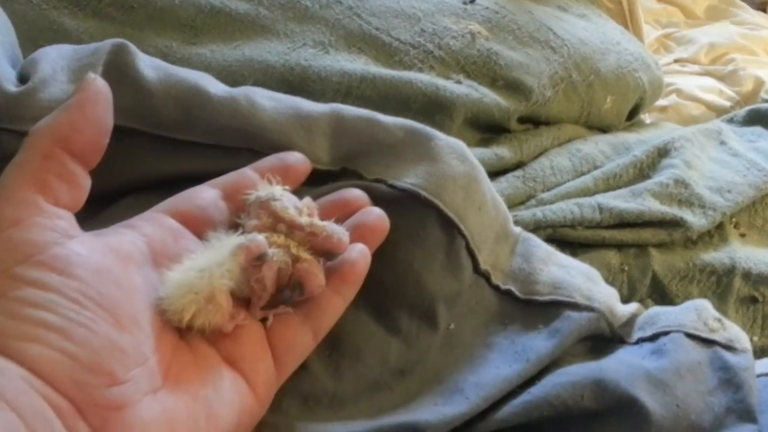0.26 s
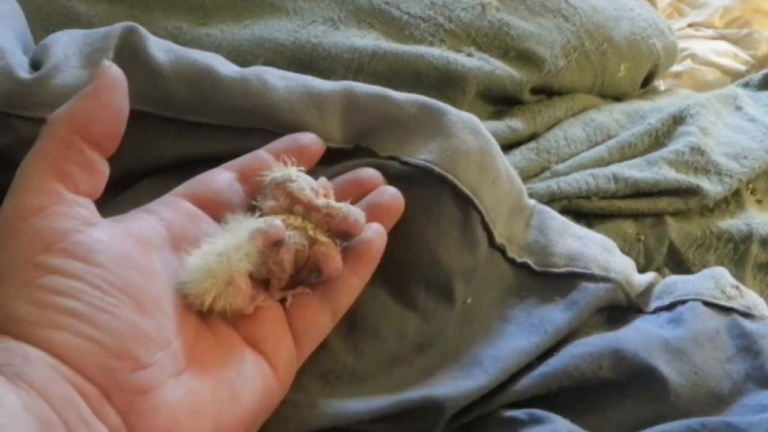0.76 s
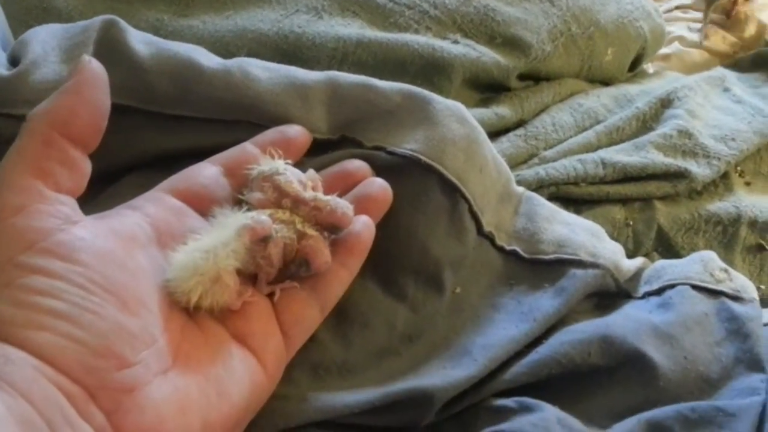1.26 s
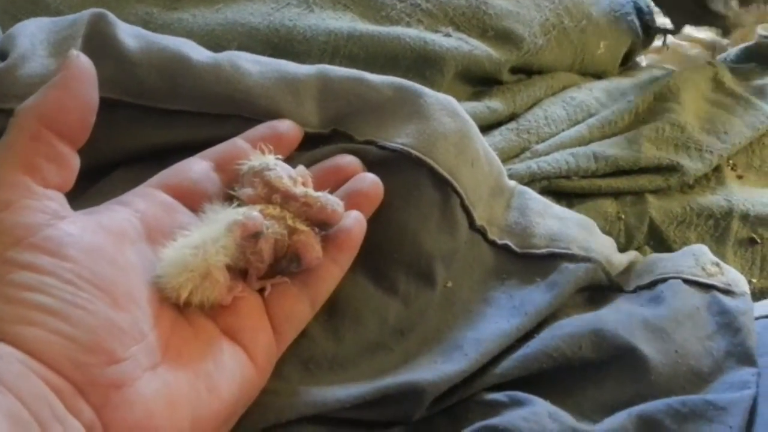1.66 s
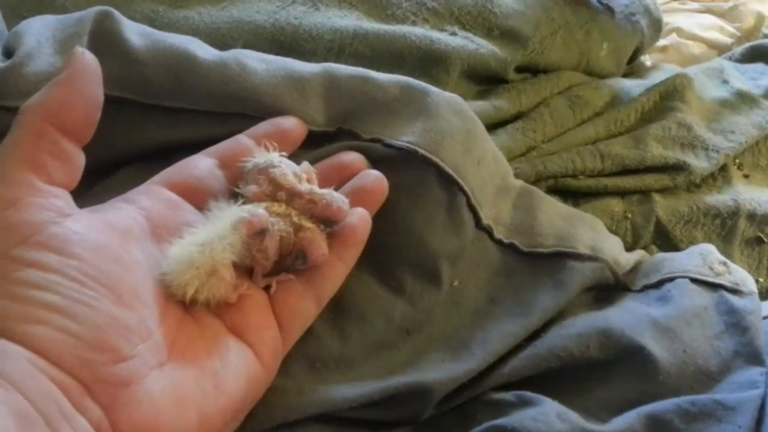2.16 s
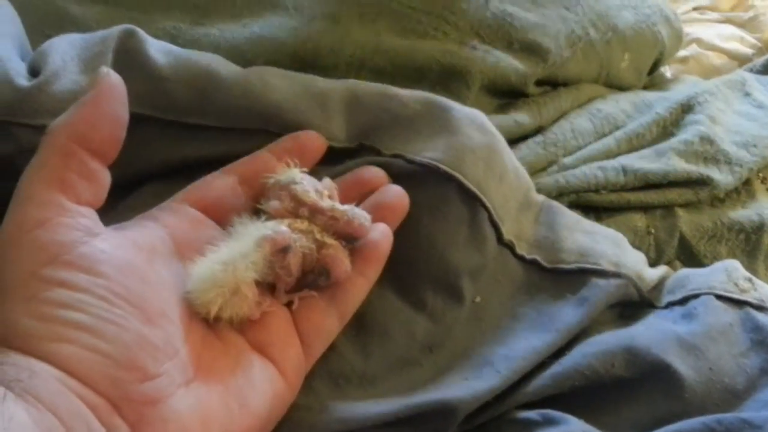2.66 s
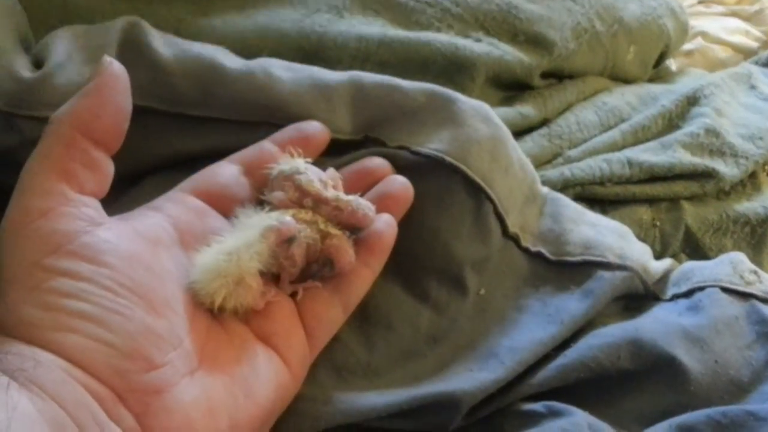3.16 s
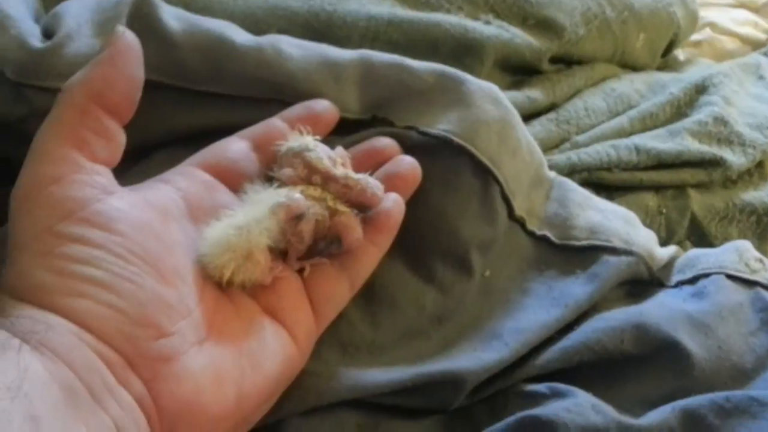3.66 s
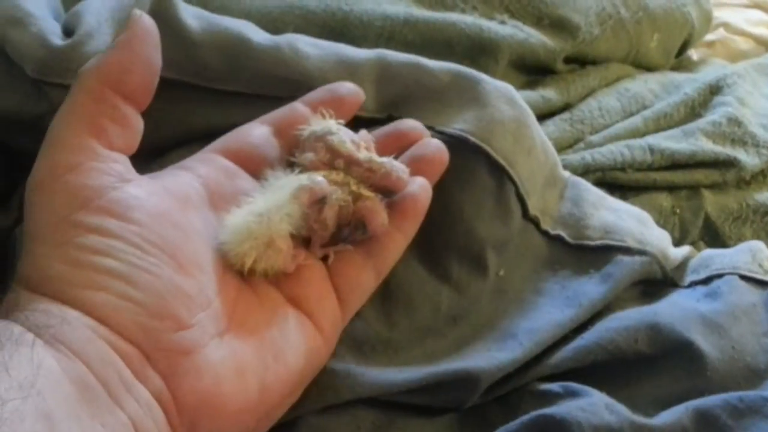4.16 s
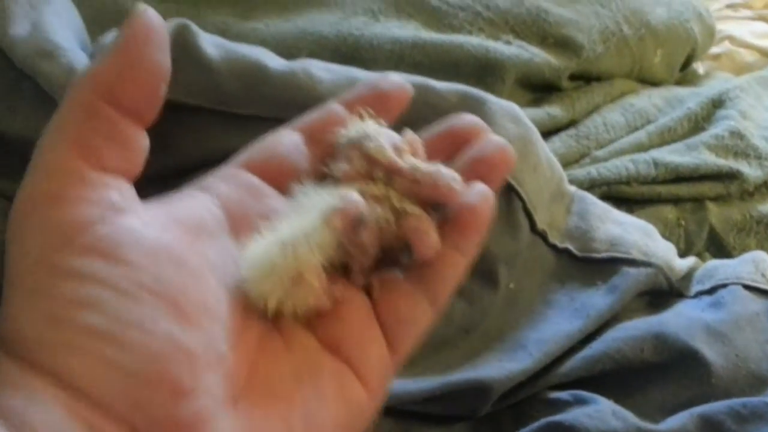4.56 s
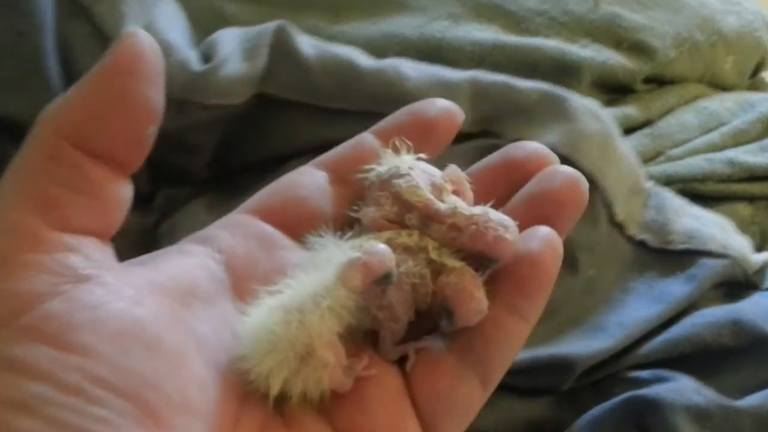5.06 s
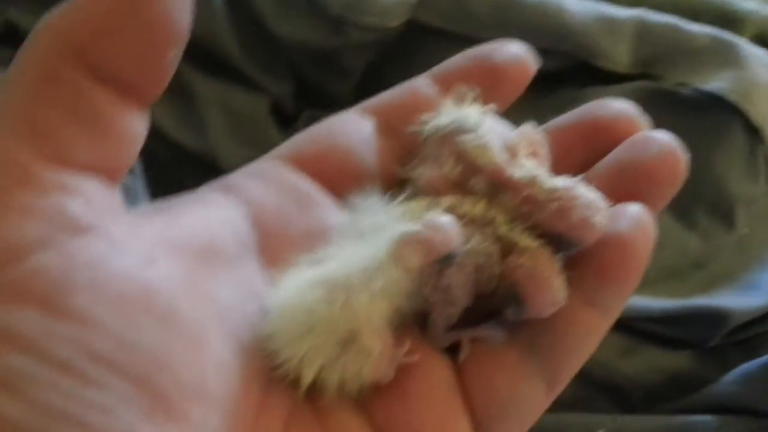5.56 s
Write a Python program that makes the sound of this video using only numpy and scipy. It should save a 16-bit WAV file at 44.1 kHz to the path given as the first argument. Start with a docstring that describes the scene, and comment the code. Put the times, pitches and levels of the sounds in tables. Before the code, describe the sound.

Two newly hatched chicks beg close to the microphone in a small, softly reverberant room. The fading tail of an earlier chirp opens the sound, with tiny ticks in the first half second, the clearest at 0.5. Raspy chirps, each about a fifth of a second, glide from roughly 1.7 kHz up to a whistle near 3 kHz and fall. Two overlap at 0.65 to 0.9, one follows at 1.0, then a pause until a weaker one at 2.15. Another overlapping pair comes at 2.65 to 2.95, then single chirps at 3.2 and 3.55. A barely audible peep at 4.05 precedes the loudest, clearest chirp at 4.5. Faint low room noise swells and sinks over a slight steady hum. Sparse little ticks recur near 1.8, 2.5, 4.1 and 5.6. Soft bright cloth brushing grows from 4.4, peaks around 5.2 and continues, with duller rustle, to the end near 5.8.

```python
"""Two begging cockatiel chicks

Two newly hatched cockatiels beg from an open hand, close to the microphone in a small room.
Each chirp is a gliding tone with overtones: it starts low, climbs through a rasp to a clear whistle
near 3 kHz and drops away; some overlap. Around them lie a faint peep, small ticks of filtered noise,
a soft brush of cloth and a low room noise that swells and sinks, with a hum."""
import sys
import numpy as np
from scipy import signal
from scipy.fft import rfft, irfft, next_fast_len
from scipy.io import wavfile
from scipy.ndimage import uniform_filter1d, minimum_filter1d, map_coordinates

SR = 44100
rng = np.random.default_rng(int(sys.argv[2]) if len(sys.argv) > 2 else 0)


def int16_out(signal):
    """Quantize to a 16-bit WAV file."""
    q = np.round(np.clip(np.atleast_2d(signal).T, -1, 1) * 32767)
    wavfile.write(sys.argv[1], SR, q.astype(np.int16))


N = 256614  # length [samples]
TOP_HZ = 15150  # band limit

# Low room noise, level over time: (time [s], level [dB])
LOW_NOISE_LEVEL = [(0, -67.5), (.55, -66), (.7, -60), (1.0, -52.5), (1.25, -52.5), (1.35, -62),
                   (1.52, -56.5), (1.7, -69), (2.0, -78.5), (2.17, -54), (2.32, -53.5), (2.5, -62.5),
                   (2.7, -74), (3.0, -60.5), (3.15, -64), (3.42, -57.5), (3.7, -49.5), (3.85, -59.5),
                   (3.97, -71.5), (4.3, -67), (4.72, -58.5), (4.95, -68), (5.4, -70), (5.6, -59.5),
                   (5.82, -62)]
# Spectrum of the low room noise: (frequency [Hz], gain [dB])
LOW_NOISE_COLOUR = [(15, -54), (25, -29.5), (64, -2), (91, -8.5), (114, 4.5), (147, -5.5), (313, -3),
                    (376, -2.5), (554, -10), (888, -11.5), (1400, -16.5), (1820, -46), (3080, -120)]
# Bright brush of cloth, level over time: (time [s], level [dB])
CLOTH_LEVEL = [(0, -66), (.6, -71), (1.3, -62), (1.55, -69.5), (1.75, -74), (2.05, -69), (2.45, -55.5),
               (2.6, -65.5), (3.95, -68.5), (4.15, -72), (4.25, -63), (4.45, -53.5), (4.9, -51.5),
               (5.2, -50.5), (5.5, -56.5), (5.65, -60.5), (5.82, -56.5)]
# Spectrum of the brush: (frequency [Hz], gain [dB])
CLOTH_COLOUR = [(1760, -38.5), (3000, -13), (3550, -13.5), (4490, -9), (6510, -3), (7350, 2.5), (8750, -8),
                (13900, -12.5), (14700, -17), (15000, -25.5)]
# Duller rustle of cloth, level over time: (time [s], level [dB])
RUSTLE_LEVEL = [(0, -54), (.2, -68), (.6, -65), (1.3, -70), (1.5, -57), (1.7, -71.5), (4.1, -73),
                (4.4, -68), (5.0, -64.5), (5.2, -59), (5.45, -64.5), (5.82, -57.5)]
# Spectrum of the rustle, also of the dull part of a tick: (frequency [Hz], gain [dB])
RUSTLE_COLOUR = [(400, -4.5), (1100, -6.5), (2200, 0), (3000, -4.5), (4500, -4), (7000, -17.5)]
# Small ticks, before the common trims: (time [s], level [dB], dull part re snap [dB], decay t60 [s])
TICKS = [(0.1289, -54.5, -2.5, 0.06), (0.2074, -41.5, -21, 0.06), (0.2886, -48, -3.5, 0.06),
         (0.3795, -50.5, -10, 0.06), (0.5078, -27, -25, 0.06), (1.8223, -49.5, -24, 0.06),
         (1.8731, -54.5, -1, 0.06), (2.5155, -51, -17.5, 0.06), (4.0502, -46.5, -29.5, 0.06),
         (4.1791, -49.5, -25.5, 0.06), (5.579, -46, -1, 0.06)]
# Spectrum of the bright snap of a tick: (frequency [Hz], gain [dB])
TICK_COLOUR = [(1180, -29.5), (2000, -9), (2760, -17), (3760, -12), (4200, -22.5), (4930, -6.5),
               (7390, -4.5), (10300, -17.5), (11500, -16), (13900, -23.5), (15000, -37.5)]
# Decay of the room tail: (frequency [Hz], t60 [s])
ROOM_DECAY = [(300, 0.22), (1600, 0.23), (2200, 0.25), (3100, 0.29), (4400, 0.3), (7000, 0.25),
              (12000, .26)]
# Chirps of each chick, one list per chirp, levels before throat and room:
# (time [s], pitch [Hz], level [dB], overtone lift [dB], roughness [0-1])
FIRST_CHICK = [
    [(.650, 1818, -20.5, 0, .15), (.672, 1942, -13.5, 3.5, .25), (.692, 2002, -16, 0, 0.4),
     (.715, 2292, -18.5, -7, 0.8), (.738, 2558, -15, 3.5, .7), (.757, 2843, -18, 10, .6),
     (.780, 3130, -26.5, 10, 0.4), (.810, 2906, -26.5, 9.5, 0.02), (.835, 2400, -28, -7.5, 0.6),
     (.855, 1998, -34, 7.5, 0.9)],
    [(1.008, 1571, -36.5, 8, 0.3), (1.037, 1740, -25.5, 1.5, 0.2), (1.045, 2034, -28, 4, .7),
     (1.075, 2146, -20, -7.5, 0.4), (1.110, 2358, -26, 3.5, .6), (1.125, 2888, -17, -5, .6),
     (1.155, 3103, -16, -11, .2), (1.168, 2950, -24, -4.5, .6), (1.177, 2192, -22, -0.5, 0.5),
     (1.197, 1530, -36, -3, 0.8)],
    [(2.123, 1615, -71, 5, 1), (2.142, 1660, -37.5, -9.5, .4), (2.155, 1645, -25, -6, 0.2),
     (2.183, 1837, -26, 0, 0.4), (2.190, 2042, -28, -1.5, 0.3), (2.245, 2186, -27.5, 6, 0.6),
     (2.260, 2852, -23, -8, 0.5), (2.283, 3087, -20.5, -7.5, 0), (2.303, 3063, -19, -6.5, 0.2),
     (2.308, 2478, -28.5, 4, .4), (2.320, 2269, -29.5, 2, 0.5), (2.335, 1642, -27.5, 0, .5)],
    [(2.762, 1590, -25.5, 2.5, .1), (2.793, 1731, -26.5, 10, .2), (2.801, 1964, -34, 14, 0.1),
     (2.830, 2091, -20, 0, 0.7), (2.870, 2493, -19, -4, 1), (2.885, 2935, -12.5, -12, .6),
     (2.910, 3100, -14, -2, .1), (2.931, 3033, -15, -2, .4), (2.937, 2338, -20.5, -1.5, 0),
     (2.965, 2013, -27.5, 6.5, 0.8)],
    [(3.532, 1589, -24, -9.5, .2), (3.553, 1736, -22, -0.5, 0.3), (3.565, 2069, -23.5, 4.5, 0.3),
     (3.590, 2175, -22, -3, 0.5), (3.620, 2474, -17.5, 2, 0.9), (3.632, 2947, -15.5, -12, 0.2),
     (3.665, 3113, -12.5, -12, 0), (3.674, 2474, -23, -1, .6), (3.700, 2290, -16.5, -5, .5),
     (3.730, 2179, -22, -6, 0.5), (3.745, 1796, -36.5, 6, .6)],
    [(4.491, 1745, -40, 4.5, 1), (4.503, 1778, -29, 7.5, 0.2), (4.524, 1799, -20, 6.5, .12),
     (4.531, 2020, -13, 1.5, .6), (4.555, 2250, -13.5, -3, 0.1), (4.578, 2462, -21, 1, 0.66),
     (4.593, 3086, -3.5, -5, 0.04), (4.613, 3204, -6, -10, 0.07), (4.641, 3102, -5, -7.5, 0.1),
     (4.646, 2570, -17, -3.5, 0.2), (4.654, 2508, -10.5, -3.5, 0.3), (4.661, 2071, -18.5, -5.5, 0.3),
     (4.670, 1992, -21, 2, 0.7)],
]
SECOND_CHICK = [
    [(.735, 1865, -26, 16, 0.44), (.750, 1900, -22.5, 5.5, 0.23), (.775, 1957, -21.5, 2.5, 0.35),
     (.792, 2080, -25, 6, 0.31), (.817, 2487, -21, 5, .55), (.850, 2890, -22, 3.5, 0.77),
     (.865, 3326, -16.5, 3.5, 0.26), (.876, 3588, -16.5, 7, .1), (.895, 3577, -17.5, -1.5, .25),
     (.905, 2762, -21.5, 3, .35), (.922, 2164, -28, 3.5, 0.55)],
    [(2.635, 1584, -30, 4, 0.28), (2.660, 1842, -22.5, 9.5, .55), (2.675, 2156, -16.5, 1, .45),
     (2.719, 2430, -18.5, -2, .25), (2.728, 2855, -14.5, -3.5, .55), (2.760, 3220, -19, -6, .3),
     (2.785, 3373, -16, -10.5, 0.11), (2.815, 3167, -19.5, -9.5, .15), (2.840, 2627, -21, -8, .4),
     (2.857, 2178, -25.5, -1, .6)],
    [(3.199, 1726, -26.5, 6.5, 0.64), (3.235, 1689, -27, 6.5, .62), (3.268, 1944, -21.5, 9, .6),
     (3.300, 2113, -21.5, 2, 0.66), (3.315, 2729, -19, -6, .75), (3.355, 2858, -15.5, -10, .45),
     (3.380, 2630, -22, -12, 0.5), (3.392, 1832, -19, 4.5, 0.091), (3.405, 1673, -25.5, 2, 0.097)],
]
# A chirp over just before time zero, leaving its room tail, and a tiny peep; same columns
FAINT_PEEPS = [
    [(-.19, 2303, -14.5, 8, 0.87), (-.14, 2983, -21, -2, 0.47), (-.10, 2692, -29, -9, 0.61)],
    [(4.049, 3722, -43, 12, .2), (4.054, 3378, -44, 14.7, 0.12), (4.059, 3230, -72, 8.8, .1)],
]
# Strength of the fundamental and its overtones, in order: (level [dB])
HARMONICS = [2.5, -4.5, -7, -11.5, -13, -25]
# Resonance of each chick's throat and beak: (frequency [Hz], gain [dB])
FIRST_THROAT = [(1000, -31), (1400, -13.5), (1750, -6), (2250, 0.5), (3100, 2), (3550, -6.5), (4300, 1.5),
                (5400, 2), (6100, -2.5), (6600, -9), (7450, -3), (8400, -16), (9500, -21), (10500, -27.5),
                (12500, -21.5), (15000, -34)]
SECOND_THROAT = [(1000, -33), (1400, -10.5), (1750, -5), (2300, -2), (3300, -0.5), (4100, 0.5),
                 (5400, -3.5), (6500, -6), (7450, -3), (8400, -11), (9500, -21), (10500, -31.5),
                 (15000, -44.5)]
# Stereo lean of the chicks, before each one's offset: (frequency [Hz], left minus right [dB])
CHICK_LEAN = [(1500, 11.5), (3000, 4.5), (4500, 10), (6000, 2), (7000, -14), (9000, -8), (14000, -12.5)]


def amp(db):
    """Decibels to amplitude."""
    return 10 ** (np.asarray(db) / 20)


def unit(x):
    """x scaled to rms 1."""
    return x / np.sqrt(np.mean(x ** 2) + 1e-20)


def along(points, hz):
    """Value at hz from (frequency, value) points on a log axis."""
    f, v = np.transpose(points)
    return np.interp(np.log(hz + 1), np.log(f + 1), v)


def curves(rows, t):
    """Each column after the time, read at times t."""
    s, *cols = np.transpose(rows)
    return [np.interp(t, s, c) for c in cols]


def wobble(rate, size):
    """A smooth random curve, rate knots a second."""
    knots = rng.standard_normal(int(size * rate / SR) + 4)
    return map_coordinates(knots, [np.arange(size) * rate / SR])


def coloured(x, gain):
    """x filtered by a gain that depends on frequency."""
    n = x.shape[-1]
    m = next_fast_len(n + 8192)  # padded so the filter's ringing does not wrap round
    return irfft(rfft(x, m) * gain(np.fft.rfftfreq(m, 1 / SR)), m)[..., :n]


def lean(db):
    """Left and right gains, db apart."""
    return amp([[db / 2], [-db / 2]])


def noise(colour, alike, lean_db):
    """Stereo noise of rms 1 before the lean; alike is the correlation of the two sides."""
    a, b = coloured(rng.standard_normal((2, N)), lambda hz: amp(along(colour, hz)))
    turn = np.arccos(np.clip(alike, -1, 1)) / 2
    return unit(np.cos(turn) * a + np.sin(turn) * np.array([b, -b])) * lean(lean_db)


def add(track, s, x):
    """Mix x into the track at time s; what sounds before time zero is dropped."""
    start = round(s * SR)
    x, start = x[:, max(-start, 0):], max(start, 0)
    track[:, start:start + x.shape[-1]] += x[:, :N - start]


def in_room(x, wet_db, early_db, early_t60, build=0.0032):
    """Direct sound, quick reflections from hand and bed, then the room's tail, different at each side."""
    hz, t, z = signal.stft(rng.standard_normal((2, SR // 2)), SR, nperseg=256)
    decay = amp(-60 * t / along(ROOM_DECAY, hz)[:, None])
    tail = signal.istft(z * decay, SR, nperseg=256)[1]
    t = np.arange(tail.shape[1]) / SR
    tail = tail * (1 - np.exp(-t / build))  # the tail needs a moment to build
    early = rng.standard_normal(tail.shape) * amp(-60 * t / early_t60)
    response = amp(wet_db) * tail / np.linalg.norm(tail[0])
    response += amp(early_db) * early / np.linalg.norm(early[0])
    response[:, 0] += 1  # direct sound
    return signal.fftconvolve(x[None], response / np.linalg.norm(response[0]), axes=1)


def room_noise():
    """Low-pitched noise, swelling and sinking widely along a set level curve, with a slight flutter."""
    t = np.arange(N) / SR
    level_db = curves(LOW_NOISE_LEVEL, t)[0] + 2.0 * wobble(14, N)
    return amp(level_db) * noise(LOW_NOISE_COLOUR, alike=.65, lean_db=1.5)


def mains_hum(hum_hz=120, hum_db=-74):
    """A steady sine hum, equal at both sides."""
    t = np.arange(N) / SR
    return amp(hum_db) * np.sin(2 * np.pi * hum_hz * t)


def cloth():
    """Cloth shifts and brushes softly: bright hiss to the right, duller rustle to the left."""
    t = np.arange(N) / SR
    hiss_db = curves(CLOTH_LEVEL, t)[0] + 2.3 * wobble(30, N)
    hiss = amp(hiss_db) * noise(CLOTH_COLOUR, alike=.1, lean_db=-4.5)
    rustle_db = curves(RUSTLE_LEVEL, t)[0] + 1.7 * wobble(35, N)
    rustle = amp(rustle_db) * noise(RUSTLE_COLOUR, alike=0.23, lean_db=8)
    return hiss + rustle


def ticks(gain_db=2, dull_gain_db=-2, lean_db=-4, attack=0.0013):
    """Small short ticks, with a little room sound: a bright, slightly soft snap over a duller part."""
    out = np.zeros((2, N))
    t = np.arange(SR // 5) / SR
    for s, db, dull_db, t60 in TICKS:
        snap = unit(coloured(rng.standard_normal(len(t)), lambda hz: amp(along(TICK_COLOUR, hz))))
        dull = unit(coloured(rng.standard_normal(len(t)), lambda hz: amp(along(RUSTLE_COLOUR, hz))))
        swell = (1 - np.exp(-t / attack)) * amp(db + gain_db - 60 * t / max(t60, .005))
        tick = swell * (snap + amp(dull_db + dull_gain_db) * dull)
        # start 2 ms ahead, since the attack is soft
        add(out, s - .002, in_room(tick, wet_db=1.5, early_db=-3.5, early_t60=.04))
    return out * lean(lean_db)


def uneven_swing(hz, n):
    """A sine swing around hz whose rate wanders."""
    rate = hz * (1 + .3 * wobble(hz / 2, n))
    return np.sin(2 * np.pi * np.cumsum(rate) / SR)


def chirp(rows, warble, warble_hz, buzz=.042, jitter=.031, shimmer_db=4, rasp_db=-21, air_db=-30,
          attack=0.0031, release=0.0076):
    """The syrinx sings one gliding tone with overtones; roughness shakes its pitch and strength."""
    start, end = rows[0][0], rows[-1][0]
    t = np.arange(start, end + release, 1 / SR)
    n = len(t)
    pitch, db, overtone_db, rough = curves(rows, t)
    # the membrane warbles slowly and buzzes faster, both unevenly
    shake = warble * uneven_swing(warble_hz, n) + buzz * uneven_swing(310, n) + jitter * wobble(1100, n)
    phase = 2 * np.pi * np.cumsum(pitch * (1 + rough * shake)) / SR
    tone = np.zeros(n)
    for order, harmonic_db in enumerate(HARMONICS, 1):
        # turbulent air spreads a noisy skirt round each partial
        skirt = amp(rasp_db) * rough * order * (wobble(1800, n) + 1j * wobble(1800, n))
        partial = np.imag((1 + skirt) * np.exp(1j * order * phase))
        tone += amp(harmonic_db + overtone_db * (order > 1)) * partial
    # air leaks most in the first moments, before the membrane is in full swing
    leak = 1 + 3 * np.exp(-(t - start) / .02)
    air = amp(air_db + overtone_db) * leak * (1 + rough) * rng.standard_normal(n)
    gate = np.clip((t - start) / attack, 0, 1) * np.clip((end + release - t) / release, 0, 1)
    return (np.sqrt(2) * tone + air) * gate * amp(db + shimmer_db * rough * wobble(380, n))


def chick(calls, throat, warble, warble_hz, gain_db, lean_db, lag):
    """One chick's chirps, shaped by throat and beak; their treble favours the right side, the rest the left."""
    out = np.zeros((2, N))
    for rows in calls:
        voice = chirp(rows, warble, warble_hz)
        add(out, rows[0][0], in_room(voice, wet_db=-0.5, early_db=0.5, early_t60=0.085))
    sides = np.array([[1], [-1]]) / 2  # left, right

    def body(hz):
        small_body = 1 / np.sqrt(1 + (1350 / (hz + 1)) ** 16)  # a small body gives little below 1350 Hz
        level_db = gain_db + along(throat, hz) + sides * (along(CHICK_LEAN, hz) + lean_db)
        left_first = np.exp(2j * np.pi * hz * lag * sides)  # the right side trails by lag [s]
        return small_body * amp(level_db) * left_first

    return coloured(out, body)


def scene():
    """Room noise, hum, cloth and ticks beneath the two begging chicks."""
    background = room_noise() + mains_hum() + cloth()
    first = chick(FIRST_CHICK + FAINT_PEEPS, FIRST_THROAT, warble=.085, warble_hz=79.86,
                  gain_db=0, lean_db=0.0, lag=.00022)
    second = chick(SECOND_CHICK, SECOND_THROAT, warble=.1, warble_hz=85.1,
                   gain_db=2.0, lean_db=0.5, lag=0.00023)
    return background + ticks() + first + second


def record(dry):
    """A quick limiter holds the peaks under full scale; nothing is kept above the band limit."""
    needed = np.minimum(1, .97 / (np.abs(dry).max(axis=0) + 1e-9))
    gain = uniform_filter1d(minimum_filter1d(needed, size=401), size=201)
    smooth_gain = uniform_filter1d(gain, size=201)
    return coloured(dry * smooth_gain, lambda hz: hz < TOP_HZ)


dry = scene()
out = record(dry)
int16_out(out)
```